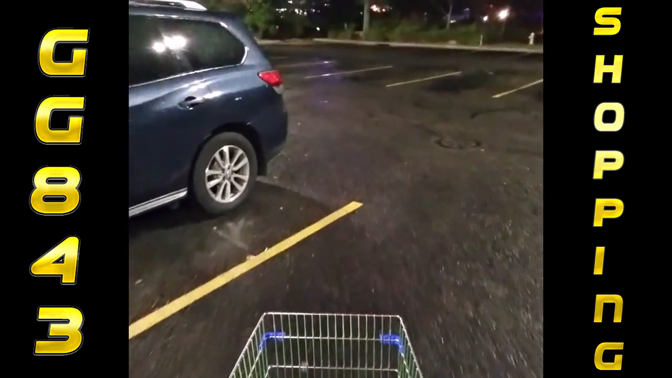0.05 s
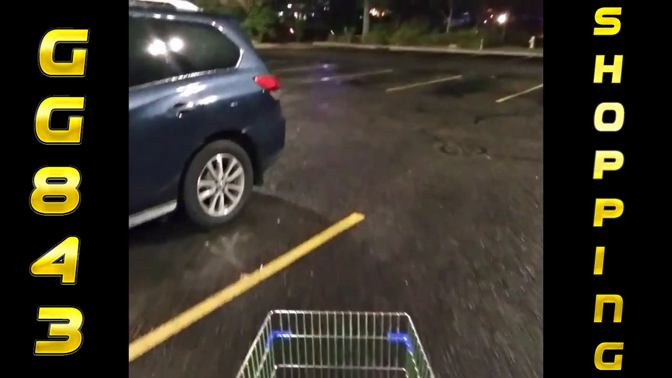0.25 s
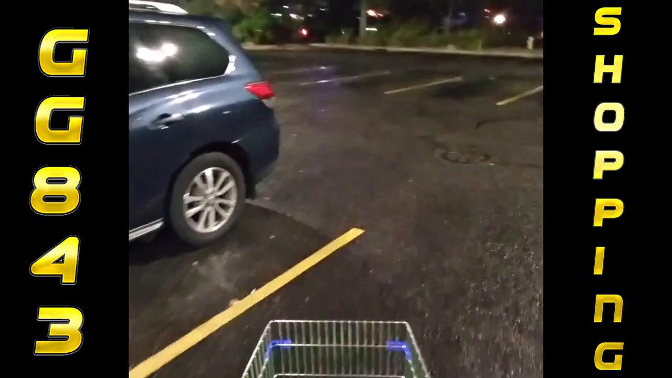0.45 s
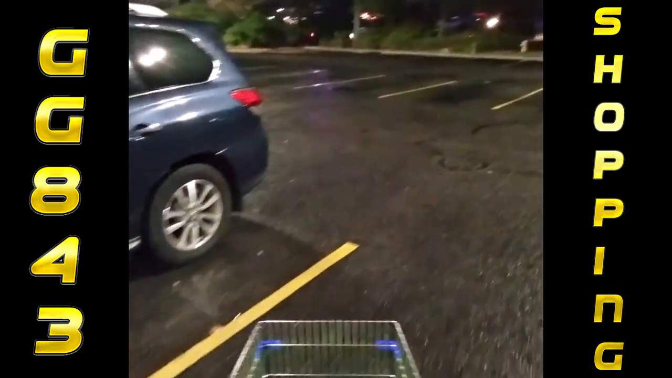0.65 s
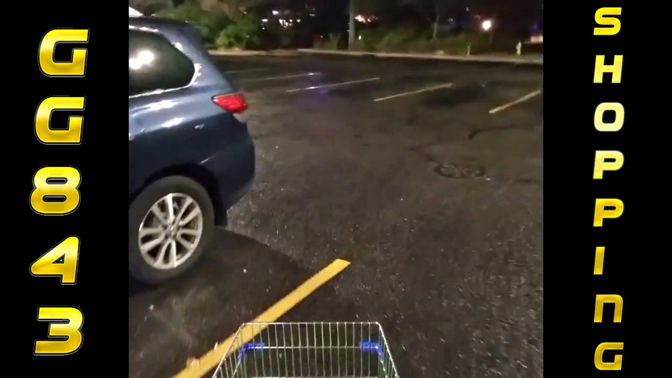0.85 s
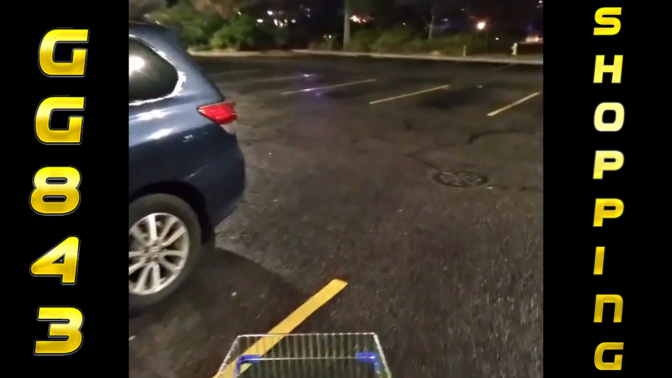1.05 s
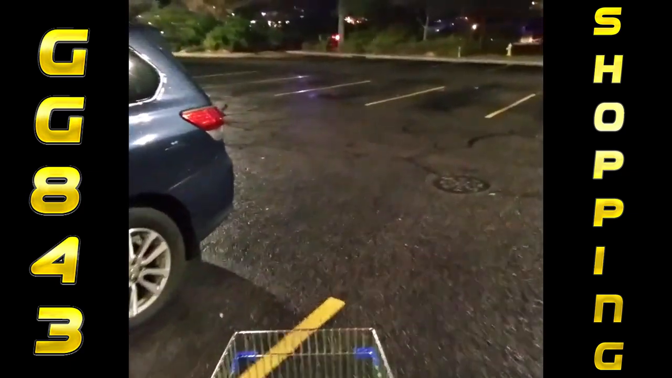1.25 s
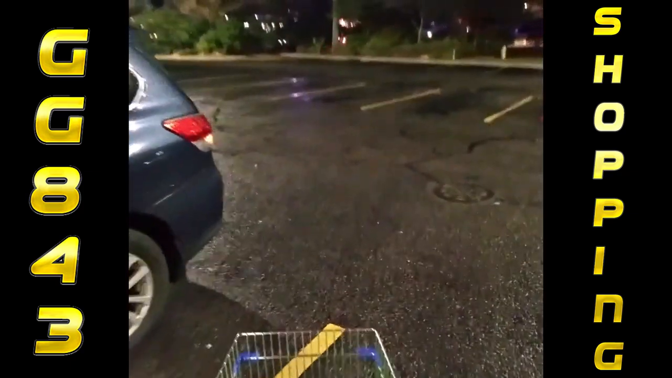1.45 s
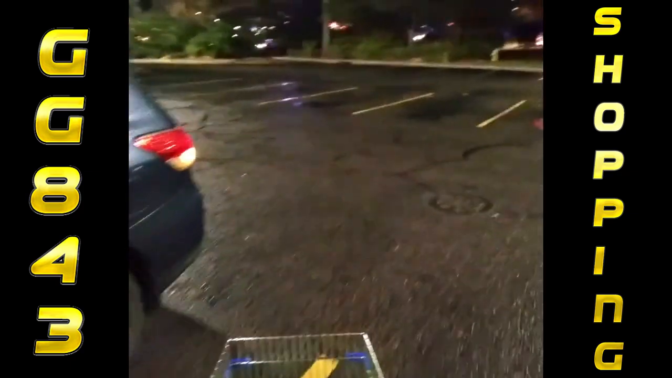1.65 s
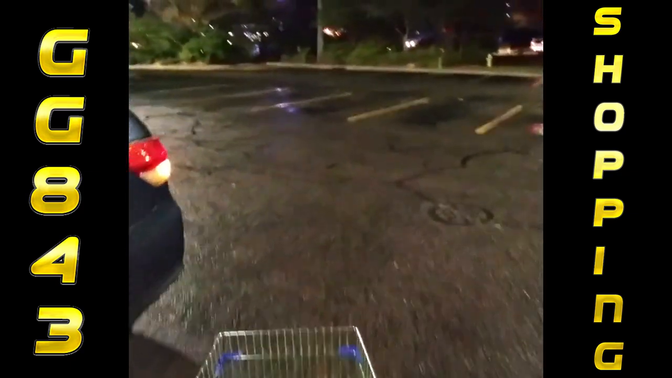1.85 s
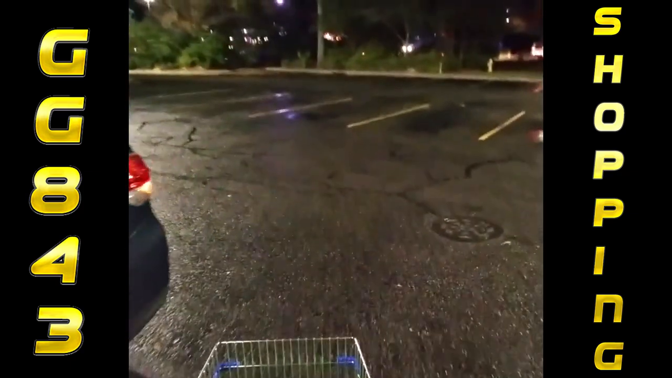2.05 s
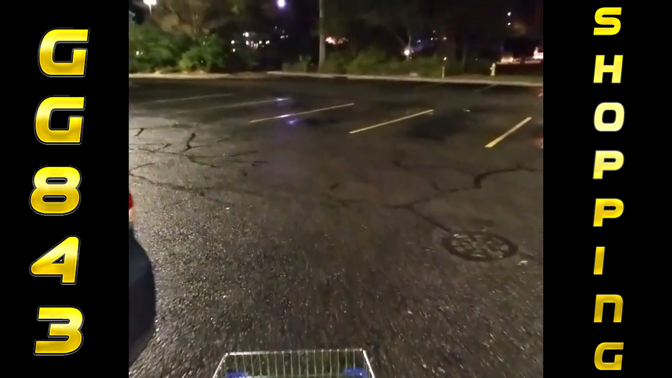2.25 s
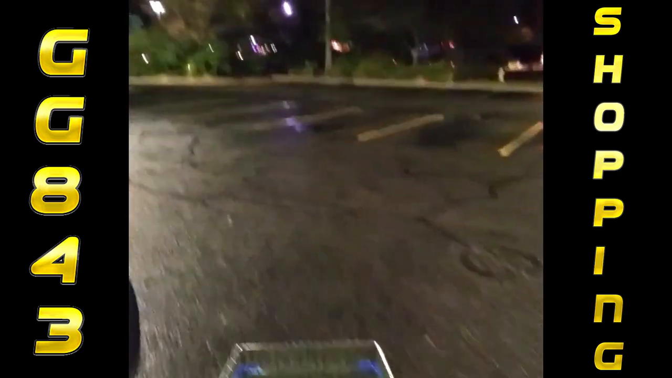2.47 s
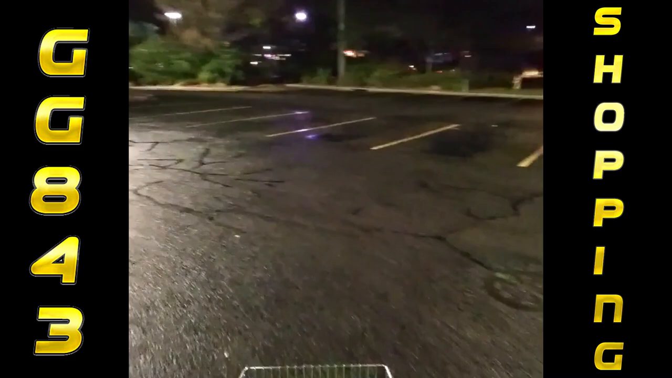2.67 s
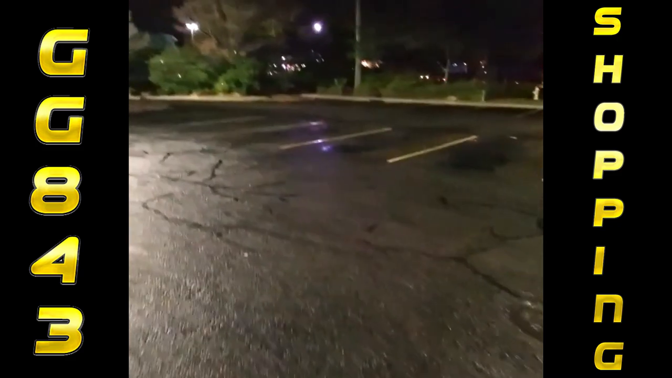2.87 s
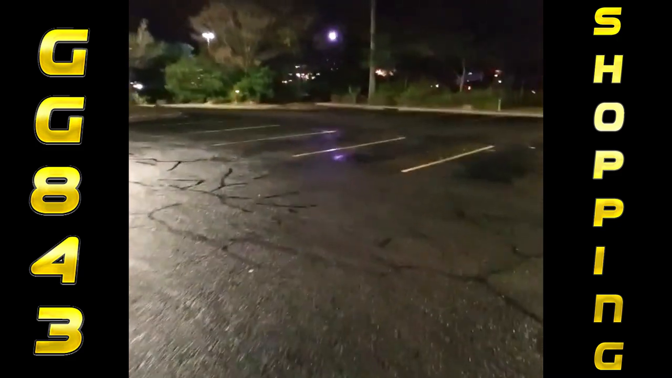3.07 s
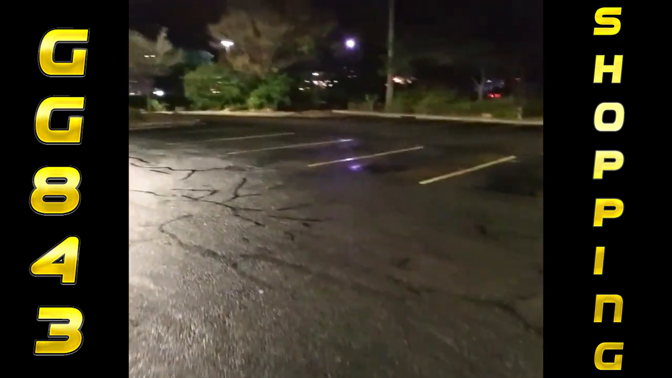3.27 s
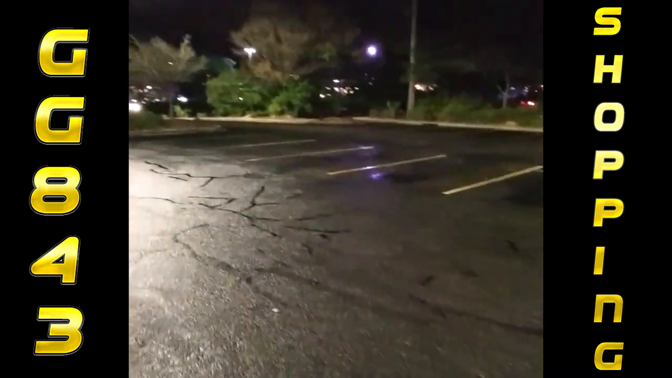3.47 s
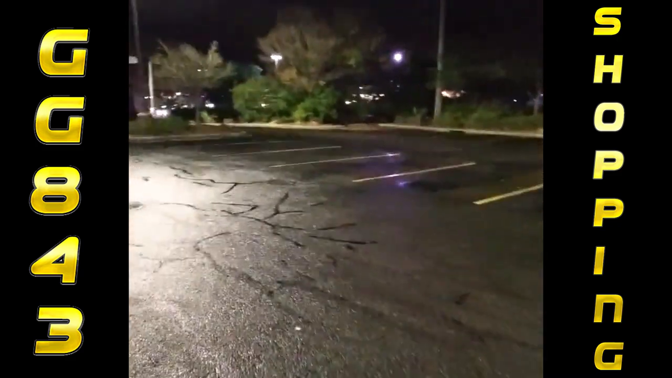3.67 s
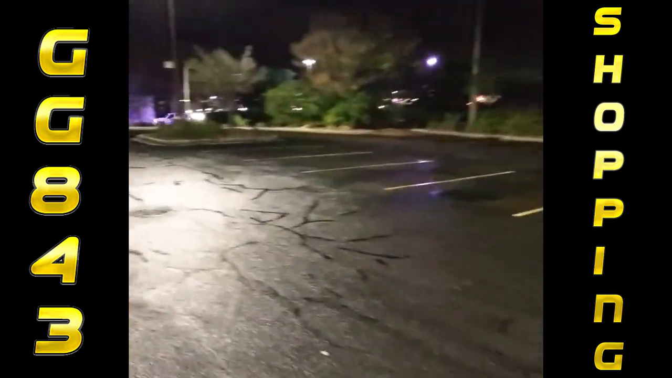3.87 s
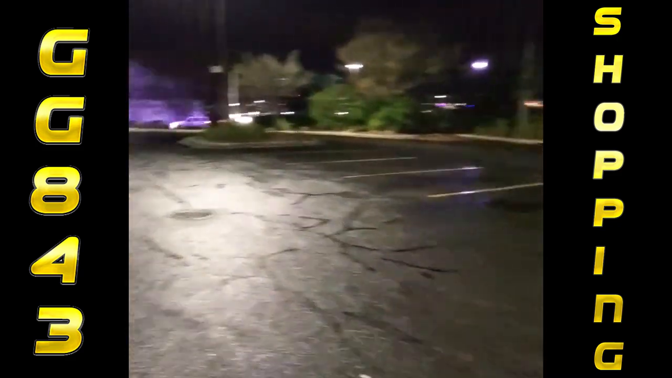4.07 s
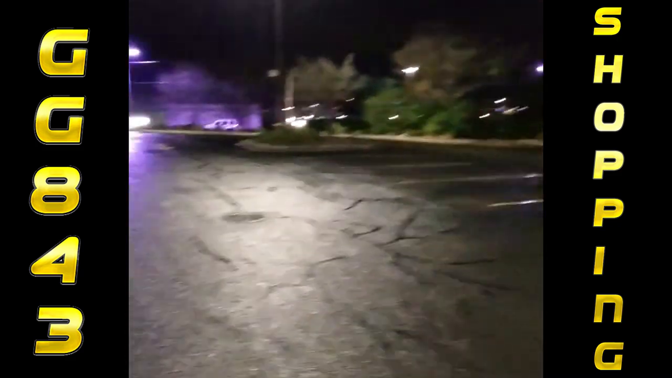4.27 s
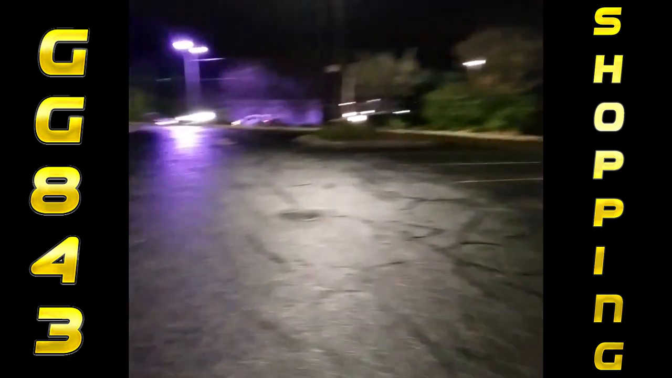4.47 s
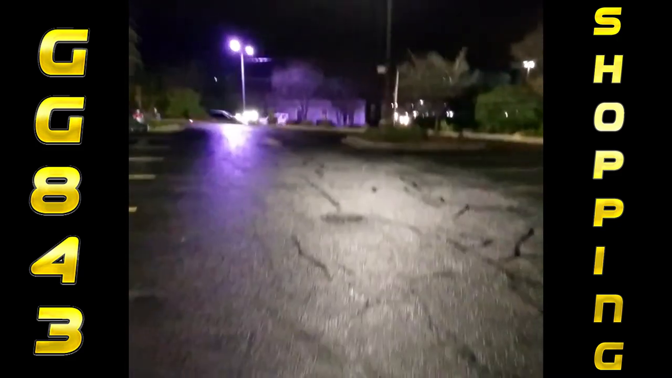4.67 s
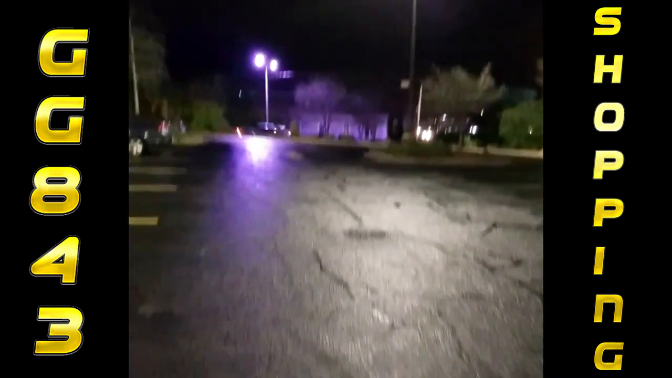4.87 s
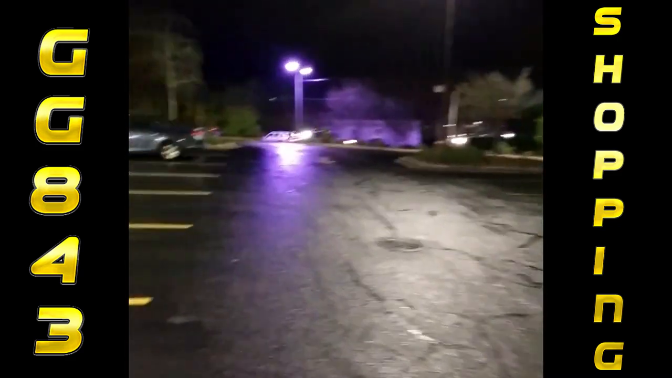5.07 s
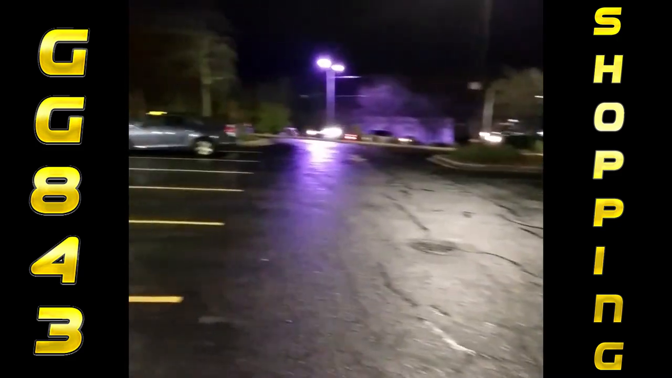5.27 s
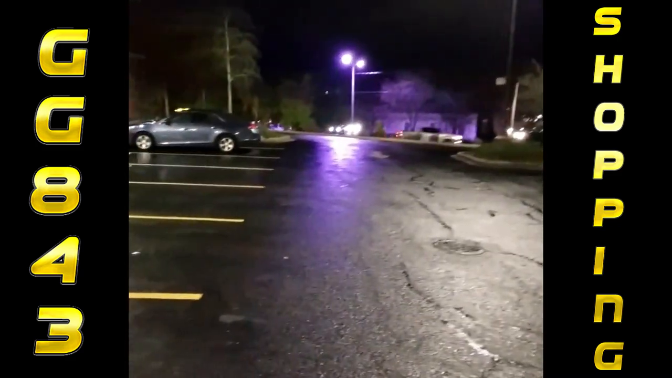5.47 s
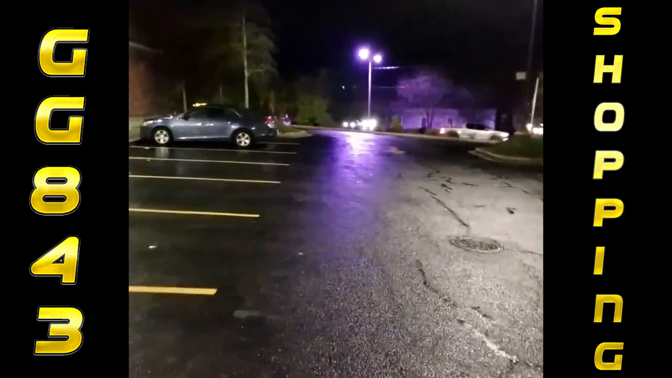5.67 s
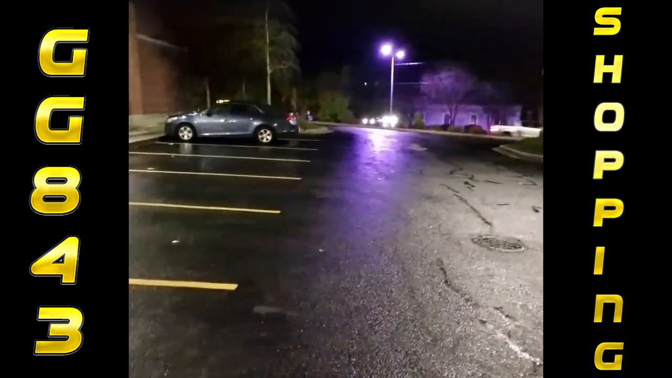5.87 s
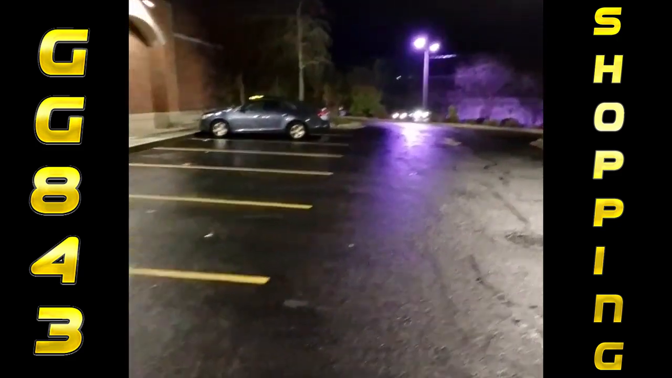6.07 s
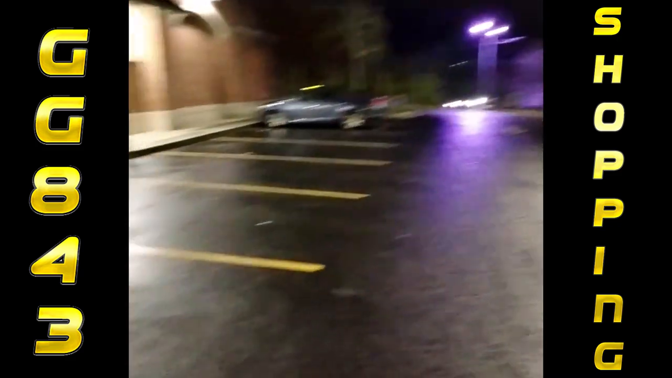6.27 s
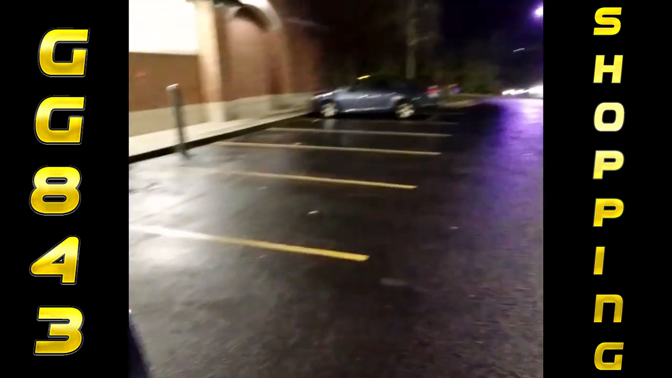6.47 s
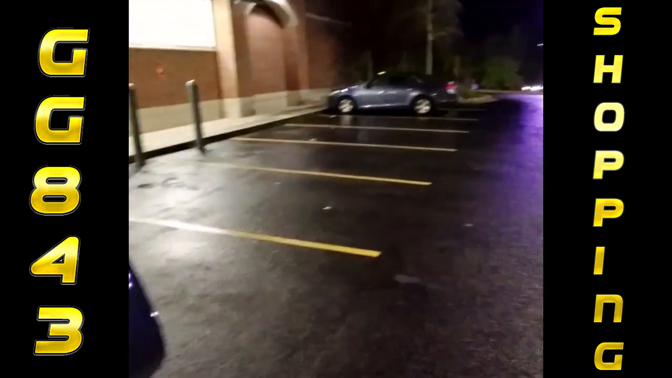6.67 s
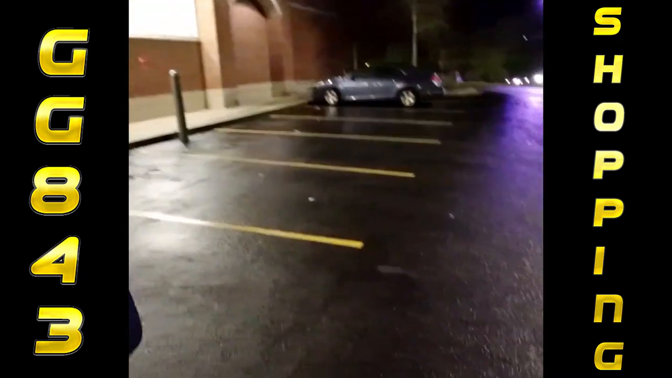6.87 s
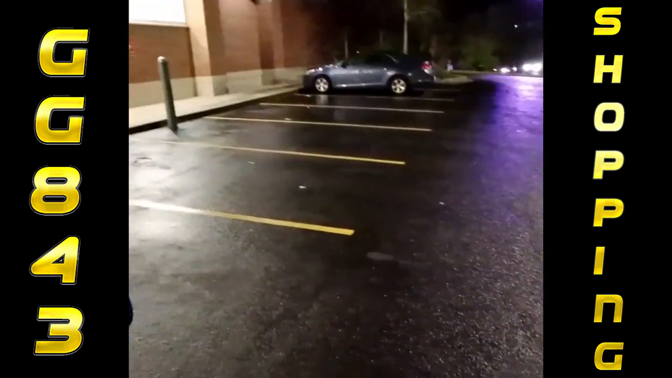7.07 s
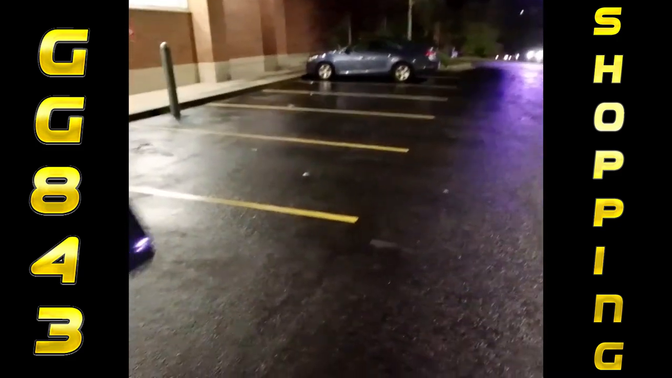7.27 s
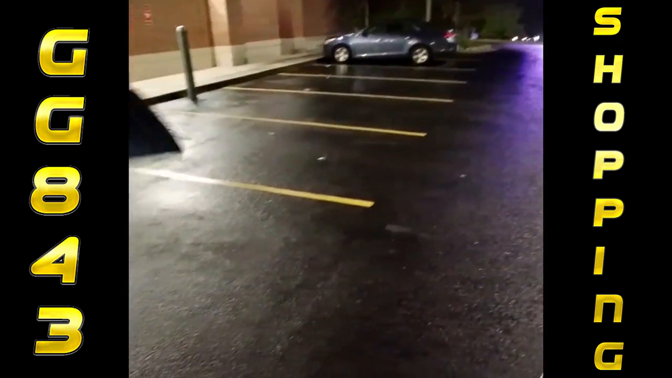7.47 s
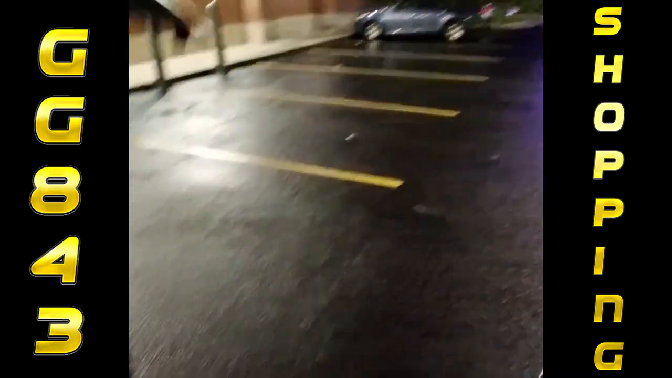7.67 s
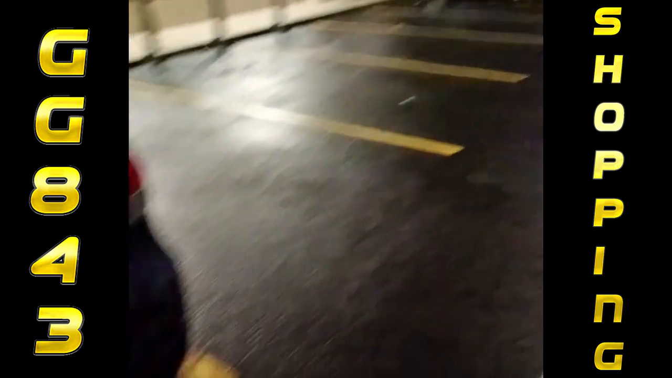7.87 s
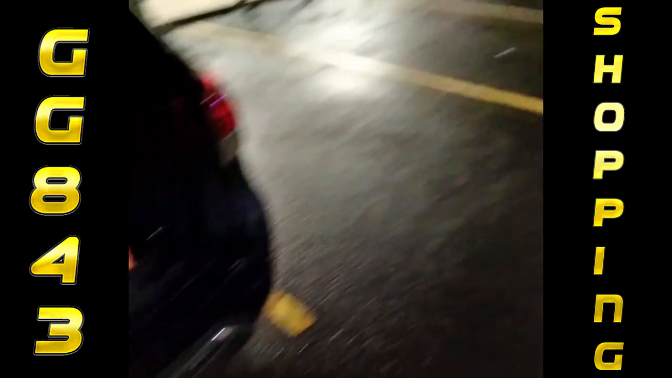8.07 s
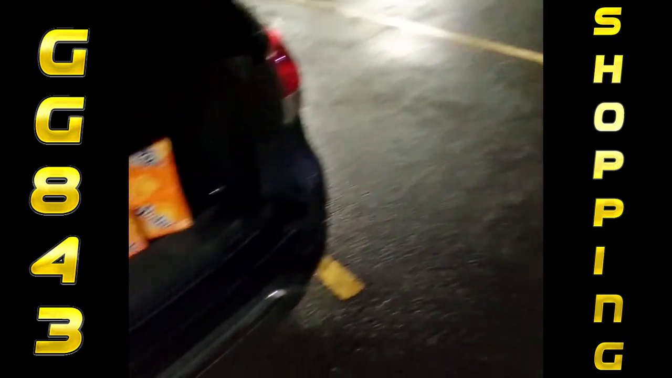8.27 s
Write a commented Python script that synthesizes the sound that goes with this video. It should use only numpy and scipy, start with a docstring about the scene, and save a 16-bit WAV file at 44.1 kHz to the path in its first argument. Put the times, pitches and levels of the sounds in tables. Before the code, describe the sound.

From the start, a metal shopping cart rolls over wet asphalt, heard from a hand-held phone just above it. Its wire basket gives a dense, bright rattle over the gritty roar and low rumble of hard wheels, with a faint ring from the frame. Frequent jolts make the wires tick and clash, and soft low thumps come in the first second and again just before 3 seconds. The cart slows at about 5 seconds and stops by 5.5 with a short cluster of knocks and a few last ticks. The parking lot is now much quieter, with a low rush of distant traffic. Two knocks sound close by at about 5.9 and 6.5 seconds. From 6 seconds a faint, far engine gathers speed. Light taps and soft swishes of cloth follow, growing into crisp crinkles around 8 seconds, just before the end.

```python
"""A wire basket rattles over roaring wheels: a metal shopping cart is pushed across wet asphalt at night.
Grit under the hard wheels rings the frame, jolts make the wires tick and clash, and soft thumps sound.
The cart stops after about 5.5 s, leaving distant traffic, two knocks, lighter taps and rustling cloth.
A hand-held phone just above the cart hears it all through two microphone openings, left and right,
which differ in the treble."""
import sys
import numpy as np
from scipy import signal
from scipy.fft import rfft, irfft, next_fast_len
from scipy.io import wavfile

SR = 44100
rng = np.random.default_rng(int(sys.argv[2]) if len(sys.argv) > 2 else 0)


def transcribe(u):
    """Save the signal u as a 16-bit wav file named by the first command-line argument.

    u: samples, shape (n,) or (channels, n), limited to [-1, 1]; the rate is SR.
    q: integer samples, one column per channel.
    """
    v = np.clip(np.atleast_2d(u).T, -1, 1)
    q = np.round(v * 32767).astype(np.int16)
    wavfile.write(sys.argv[1], SR, q)


N = 367353
TIME = np.arange(N) / SR
FFT_SIZE = next_fast_len(N + SR // 4)
HZ = np.maximum(np.arange(FFT_SIZE // 2 + 1) * SR / FFT_SIZE, 1)


def from_db(db):
    """Turn decibels into a factor to multiply by."""
    return 10 ** (np.asarray(db) / 20)


def rms_one(x):
    """Scale a signal so that its average strength (rms) is 1."""
    return x / np.sqrt(np.mean(x ** 2) + 1e-20)


def in_time(rows):
    """Join a table's points into curves over time."""
    times, *columns = np.transpose(rows)
    return [np.interp(TIME, times, column) for column in columns]


def in_hz(rows):
    """Join a table's points into curves over frequency."""
    hz, *columns = np.transpose(rows)
    return [np.interp(np.log(HZ), np.log(hz), column) for column in columns]


def tone_filter(db):
    """Turn a dB curve into a filter that never sounds ahead of its input (minimum phase)."""
    cepstrum = irfft(db * np.log(10) / 20, FFT_SIZE)
    cepstrum[1:FFT_SIZE // 2] *= 2
    cepstrum[FFT_SIZE // 2 + 1:] = 0
    return np.exp(rfft(cepstrum))


def drift(rate_hz):
    """A smooth random wobble, about 1 in size."""
    step = 40   # samples per random value
    r = np.exp(-2 * np.pi * rate_hz * step / SR)
    slow = signal.lfilter([1], [1, -2 * r, r * r], rng.standard_normal(N // step + 2002))[2000:]
    return np.interp(np.arange(N) / step, np.arange(len(slow)), rms_one(slow))


def ring(clicks, hz, t60):
    """Each click starts a tone. Its ring time, t60, is the seconds it takes to fade by 60 dB."""
    r, angle = from_db(-60 / (t60 * SR)), 2 * np.pi * hz / SR
    return signal.lfilter([0, np.sin(angle)], [1, -2 * r * np.cos(angle), r * r], clicks + 1e-18)


def bursts(times, dbs, t60, rise_s, holds=0):
    """Power over time of events that rise fast, hold and die away."""
    power = np.zeros(N + SR)
    for s, db, hold in np.broadcast(times, dbs, holds):
        t = np.arange(int((hold + t60) * SR)) / SR
        rise = 1 - np.exp(-t / rise_s)
        fall = from_db(db - 60 * np.maximum(t - hold, 0) / t60)
        start = round(s * SR)
        power[start:start + len(t)] += (rise * fall) ** 2
    return power[:N]


def grains(per_s, spread_db):
    """Two separate streams of tiny random clicks of uneven size."""
    sizes = from_db(spread_db * np.minimum(rng.exponential(1, (2, N)), 5))
    signs = rng.choice([-1, 1], (2, N))
    return rms_one(sizes * signs * (rng.random((2, N)) < per_s / SR))


def struck(ticks, tones, wobble_db, rate_hz, span_s):
    """Share ticks among eight groups of ringing tones; each tone swells and fades on its own."""
    group, rings = rng.integers(0, 8, N), np.zeros((2, N))
    part = slice(*[int(s * SR) for s in span_s])
    for k, (hz, db, t60) in enumerate(tones):
        gain = from_db(db + wobble_db * np.clip(drift(rate_hz), -3, 1.6)) / np.sqrt(t60)
        hits = gain * ticks * (group == k % 8)
        rings[:, part] += ring(hits[:, part], hz, t60)
    return rings * np.std(ticks) / np.std(rings)


# How the right microphone differs from the left, for sound from all around:
# (frequency [Hz], right minus left [dB], share from other paths [dB], phase shift [rad])
FROM_AROUND = [(60, 0, -35, 0), (350, 0, -33, 0), (900, 0, -18, 0), (2000, 0, -5, .3),
               (2750, -6, -.8, -1.2), (3600, -2, -.8, -1), (4800, 9, -.4, .5), (5600, 8, -.2, .5),
               (6500, -1, -1.5, 0), (9000, -7, -.4, 1), (12000, -17, -.2, 2.8), (14000, -11, -.8, 3)]
# The same for sound from the cart:
# (frequency [Hz], right minus left [dB], share from other paths [dB], phase shift [rad])
FROM_CART = [(60, 2.6, -6, 0), (400, 2.2, -12, 0), (750, .9, -18, 0), (1100, .2, -23, 0), (1800, 0, -25, 0),
             (2300, 0, -17, 0), (2580, -1, -5, -.2), (2750, -3, -1.2, -1.3), (2930, -2.7, -1.6, -2.7),
             (3100, -1.6, -4.5, -3.0), (3290, -.6, -12, -3.14), (3460, -2.5, -1.2, -3.8),
             (3620, -4.5, -.9, -5.3), (3960, -4.2, -1.6, -6), (4300, -1, -3, -6), (4800, 2, -3.5, -6.2),
             (5200, 2.2, -1.5, -6.4), (5500, 5.5, -.5, -9.4), (5800, 0, -.3, -9.3), (6350, -3, -.1, -7.9),
             (6650, -2.5, -1.2, -6.6), (7900, -3, -.1, -4.6), (9500, -8.5, -.6, -4.4),
             (10900, -8.5, -1, -4.9), (12000, -15, -.2, -3.7), (13400, -9, -1.2, -3.1)]

def microphones(pair, spectrum, direction, dips=()):
    """Shape a sound's tone. The right side mixes a shifted copy of the left with sound from other paths."""
    colour = tone_filter(in_hz(spectrum)[0])
    colour /= np.sqrt(np.mean(abs(colour) ** 2))
    right_db, other_db, phase = in_hz(direction)
    for hz, width, db in dips:
        right_db = right_db + db / (1 + (2 * (HZ - hz) / width) ** 2)
    share = from_db(np.minimum(other_db, 0))
    left, other = rfft(pair, FFT_SIZE) * colour
    shifted = np.sqrt(1 - share ** 2) * np.exp(1j * phase) * left
    right = from_db(right_db) * (shifted + share * other)
    return irfft([left, right], FFT_SIZE)[:, :N]


# The traffic as the phone turns it down, then lets it rise: (time [s], level [dB])
TRAFFIC_LEVEL = [(0, -69), (1.2, -86), (5.3, -39), (8.33, -41)]
# Its tone, from bass to treble: (frequency [Hz], relative level [dB])
TRAFFIC_SPECTRUM = [(25, -28), (45, -9.5), (90, 1), (170, -2), (340, -9), (860, -9), (1550, -14),
                    (2400, -25), (2800, -29), (4000, -35.5), (5200, -50), (6100, -39), (7600, -40),
                    (8600, -42), (14400, -42.5)]

def traffic():
    """A low rush of distant traffic; a set curve stands for the phone turning it down at first."""
    level = from_db(in_time(TRAFFIC_LEVEL)[0] + 0.33 * drift(5.4))
    return microphones(level * rng.standard_normal((2, N)), TRAFFIC_SPECTRUM, FROM_AROUND)


# A far engine gathers speed: (time [s], firing rate [Hz], level [dB])
ENGINE_RUN = [(6.0, 68, -70), (6.3, 69.1, -60), (6.8, 76.2, -52), (7.3, 88, -52), (7.6, 88.9, -45.5),
              (8.33, 89.1, -52)]

def engine():
    """The engine's firing makes a low, wavering tone and a second one an octave higher."""
    hz, db = in_time(ENGINE_RUN)
    phase = 2 * np.pi * np.cumsum(hz * (1 + .035 * drift(10))) / SR
    low = from_db(2.3 * drift(11)) * np.sin(phase)
    octave = from_db(-2 + 1.4 * drift(3.5)) * np.sin(2 * phase)
    return np.sqrt(2) * from_db(db) * (low + octave)


def hum(hz=121, start_s=6.2, stop_s=6.55, peak_db=-44):
    """A short, low hum swells and fades at one pitch."""
    progress = np.clip((TIME - start_s) / (stop_s - start_s), 0, 1)
    return from_db(peak_db) * np.sin(np.pi * progress) * np.sin(2 * np.pi * hz * TIME)


# Cloth moving near the phone: (start [s], length [s], level [dB])
SWISHES = [(6.244, 0.45, -53), (6.967, 0.19, -53.5), (7.223, 0.89, -50), (7.96, 0.19, -47.5),
           (8.154, 0.086, -38.5)]
# The tone of a swish: (frequency [Hz], relative level [dB])
SWISH_SPECTRUM = [(2500, -3.5), (4000, -13.5), (5300, -24), (7000, -11), (9000, -8.5), (10500, -4.5),
                  (12500, -1), (14200, -0.5)]

def cloth_swishes(rise_s=0.12, t60=0.39):
    """Rubbing fabric hisses, and its weave adds fleeting streaks of pitch."""
    stroke = np.zeros(N)
    for start, length, db in SWISHES:
        rise = np.clip((TIME - start) / rise_s, 0, 1) ** 2
        stroke += rise * from_db(db - 60 * np.maximum(TIME - start - length, 0) / t60)
    rubbing = stroke * from_db(0.83 * drift(15)) * grains(per_s=15000, spread_db=1)
    weave = [(hz, 0, .012) for hz in np.geomspace(9000, 14000, num=16)]
    streaks = from_db(-6) * struck(rubbing, weave, wobble_db=8, rate_hz=8, span_s=(5.5, 9))
    return microphones(rubbing + streaks, SWISH_SPECTRUM, FROM_AROUND)


# The cart's last ticks, a knock's crisp edge, then cloth crinkles: (time [s], rough peak level [dB])
CLICK_SPRAYS = [(5.5488, -36), (5.6384, -42), (5.682, -32), (5.8864, -23), (5.894, -20), (6.848, -42),
                (7.1816, -36), (7.9094, -36), (8.0447, -24), (8.079, -16.5), (8.1387, -27), (8.2139, -19),
                (8.2596, -18.5)]
# The tone of a spray: (frequency [Hz], relative level [dB])
SPRAY_SPECTRUM = [(2500, -3), (4000, -27), (5300, -26), (7000, -5), (9500, -2.5), (10500, -3), (11500, -3),
                  (13000, 7), (14200, 0.5)]

def click_sprays(peak_over_average_db=9.5):
    """Short, bright sprays of tiny clicks."""
    times, peak_db = np.transpose(CLICK_SPRAYS)
    power = bursts(times, peak_db - peak_over_average_db, t60=0.069, rise_s=.002)
    clicks = np.sqrt(power) * grains(per_s=10000, spread_db=2.5)
    return microphones(clicks, SPRAY_SPECTRUM, FROM_AROUND)


# Knocks and taps: (time [s], peak level [dB], middle of the pitch range [Hz])
KNOCKS = [(5.287, -26, 600), (5.295, -23, 955), (5.306, -27, 620), (5.317, -30, 950), (5.3296, -25, 1300),
          (5.347, -26.5, 900), (5.887, -17.5, 142), (5.889, -18.5, 830), (5.89, -32, 3200),
          (5.896, -20.5, 1090), (5.909, -24, 243), (5.924, -37, 210), (6.481, -20.5, 690),
          (6.4858, -30.5, 1300), (6.495, -23.5, 546), (6.518, -28, 800), (6.949, -39, 520),
          (7.181, -39, 1600), (7.299, -36, 91), (7.749, -39, 1500), (7.789, -31, 950), (7.905, -31, 1290),
          (8.026, -31.5, 720), (8.09, -30.5, 1090), (8.144, -31.5, 870), (8.2, -36, 1650),
          (8.237, -32, 1260)]
# Tones of the knocked object: (pitch [Hz], relative level [dB], ring time [s])
KNOCK_TONES = [(85, -0.5, 0.2), (132, -27, 0.037), (197, -2, 0.09), (254, 7.5, 0.051), (393, -5, 0.24),
               (458, 9, 0.026), (683, -4.5, 0.046), (946, -6, 0.1), (1750, -9.5, 0.088)]

def knocks(edge_ratio=1.59, tail_db=-6.5):
    """A hit rings a dull object and leaves a short, rough tail; its size sets which pitches sound."""
    out, click = np.zeros(N + SR), np.zeros(SR // 3)
    click[0] = 1
    t = np.arange(len(click)) / SR
    body = sum(from_db(db) * ring(click, hz, t60) for hz, db, t60 in KNOCK_TONES)
    for s, db, hz in KNOCKS:
        band = signal.butter(2, [hz / edge_ratio, hz * edge_ratio], "band", fs=SR, output="sos")
        muffle = signal.butter(2, 1.5 * edge_ratio * hz, fs=SR, output="sos")
        tail_t60 = 0.18 * (600 / hz) ** 0.57   # low tails last longer
        fade = from_db(-60 * t / tail_t60) * (1 - np.exp(-t / .0015))
        noise = fade * rng.standard_normal(len(t))
        tail, hit = signal.sosfilt(np.vstack([band, muffle]), [noise, body])
        knock = hit / np.max(abs(hit)) + from_db(tail_db) * tail / np.max(abs(tail))
        start = round(s * SR)
        out[start:start + len(t)] += from_db(db) * knock
    return out[:N]


# Low thumps:
# (time [s], peak level [dB], first pitch [Hz], last pitch [Hz], length [s], left minus right [dB])
THUMPS = [(0.313, -28, 85, 90, 0.043, -7), (0.334, -25, 330, 330, 0.013, -5),
          (0.345, -29, 170, 170, 0.013, -2), (.545, -33.5, 154, 152, 0.035, -11),
          (.566, -27, 125, 115, 0.031, -9), (0.633, -23, 190, 190, 0.0074, -2),
          (0.656, -30, 135, 135, 0.023, -2), (0.681, -29, 210, 210, 0.009, -2),
          (0.688, -22, 303, 305, 0.0078, -3), (.918, -32.5, 185, 170, 0.035, -2),
          (1.03, -27.5, 221, 222, .024, -2), (2.719, -27, 143, 138, 0.022, 0),
          (2.858, -25, 99.5, 135, 0.03, -1), (2.895, -27.5, 90, 90, 0.062, 0),
          (2.946, -27, 87, 247, 0.028, -5)]

def thumps():
    """Short, soft, low thumps near the phone, mostly to the right, some sliding in pitch."""
    out = np.zeros((2, N))
    for s, db, first_hz, last_hz, length, pan_db in THUMPS:
        progress = np.arange(int(length * SR)) / (length * SR)
        hz = first_hz + (last_hz - first_hz) * progress
        wave = np.sin(np.pi * progress) ** 2 * np.sin(2 * np.pi * np.cumsum(hz) / SR)
        start = round(s * SR)
        out[:, start:start + len(wave)] += from_db(db + pan_db * np.array([[.5], [-.5]])) * wave
    return out


# Jolts that shake the cart: (time [s], relative level [dB], length of the shaking [s])
JOLTS = [(0.004, -22.0, 0.094), (0.123, -21, 0.029), (0.242, -19.5, 0.014), (0.309, -22, 0.013),
         (0.385, -20.5, 0.039), (0.736, -27, 0.041), (0.778, -17.5, 0.036), (0.869, -32, 0.01),
         (0.891, -24, 0.01), (0.981, -31, 0.017), (1.002, -27, 0.017), (1.08, -21, 0.014),
         (1.119, -23.5, 0.01), (1.158, -24, 0.098), (1.332, -23.5, 0.046), (1.369, -20.5, 0.032),
         (1.418, -22.5, 0.011), (1.447, -19.5, 0.02), (1.528, -22, 0.056), (1.623, -24.5, 0.081),
         (1.675, -22, 0.021), (1.769, -23.5, 0.089), (1.867, -23, 0.023), (2.069, -26, 0.063),
         (2.246, -24.0, 0.026), (2.356, -22.5, 0.046), (2.384, -21, 0.027), (2.466, -27.0, 0.074),
         (2.529, -27.5, 0.073), (2.674, -41, 0.0092), (2.733, -28.5, 0.01), (2.753, -23, 0.047),
         (2.875, -30, 0.013), (2.912, -24, 0.078), (2.989, -20.5, 0.032), (3.084, -23, 0.01),
         (3.127, -23.5, 0.01), (3.158, -35, 0.014), (3.221, -24.5, 0.019), (3.332, -21, 0.054),
         (3.445, -25, 0.007), (3.543, -28.5, 0.064), (3.717, -27.5, 0.039), (3.766, -20.5, 0.012),
         (3.82, -25, 0.047), (3.903, -23.5, 0.042), (4.017, -25, 0.04), (4.036, -28, 0.064),
         (4.256, -27, 0.01), (4.299, -23, 0.025), (4.36, -22.5, 0.028), (4.44, -27, 0.017),
         (4.489, -23, 0.017), (4.611, -31.5, 0.036), (4.73, -24, 0.037), (4.802, -27, 0.046),
         (4.852, -25, 0.036), (4.943, -32, 0.013), (4.965, -25.5, 0.007), (4.996, -27, 0.007),
         (5.057, -34, 0.077), (5.19, -33.5, 0.035), (5.269, -30, 0.0092), (5.382, -33, 0.002),
         (5.434, -37, 0.0053)]

def jolt_power(gain_db, rise_s):
    """How hard the jolts shake the cart over time; each holds a while, then dies away."""
    times, db, holds = np.transpose(JOLTS)
    return bursts(times, db + gain_db, t60=0.24, rise_s=rise_s, holds=holds)


# Wire hitting wire: (time [s], level [dB])
CLASHES = [(0.2438, -15), (0.392, -14), (0.400, -12), (0.799, -12), (1.5349, -15), (1.7878, -12),
           (2.686, -13), (2.9262, -7), (3.0145, -11), (3.0288, -9), (3.0944, -11), (3.3393, -16),
           (3.352, -14), (3.7713, -12), (4.7371, -15), (5.0644, -22)]

def clash_power():
    """Short, sharp spikes of power where the wires clash."""
    times, db = np.transpose(CLASHES)
    return bursts(times, db, t60=.03, rise_s=.0012)


# The frame's main ringing tone: (time [s], relative level [dB], pitch [Hz])
FRAME_RING = [(0.0, -52, 730), (0.03, -39, 703), (0.29, -34.5, 699), (0.39, -26, 726), (0.48, -39, 707),
              (1.23, -34.5, 694), (1.27, -41, 713), (1.51, -31, 690), (2.24, -38.5, 723),
              (2.49, -30.5, 697), (2.65, -36.5, 723), (2.71, -38.5, 661), (3.01, -32, 710),
              (3.21, -39.5, 732), (3.48, -37.5, 661), (3.5, -52, 721), (3.65, -31.5, 672), (4.14, -39, 709),
              (4.21, -27, 714), (4.26, -39.5, 722), (4.46, -26.5, 694), (4.71, -38.5, 708),
              (4.75, -31.5, 696), (5.2, -49, 683)]

def frame_ring(width_hz=55, gain_db=-2, flutter_db=2):
    """Grit keeps the frame ringing: a narrow band of noise around a wandering pitch."""
    db, hz = in_time(FRAME_RING)
    phase = 2 * np.pi * np.cumsum(hz) / SR
    smoothing = signal.butter(1, width_hz / 2, fs=SR, output="sos")
    slow = signal.sosfilt(smoothing, rng.standard_normal((2, N)))
    tone = rms_one(slow[0] * np.cos(phase) + slow[1] * np.sin(phase))
    pan_db = np.array([[-.5], [.5]])
    return from_db(db + gain_db + flutter_db * drift(17) + pan_db) * tone


# How loud the wheels roar between jolts: (time [s], level [dB])
ROAR_LEVEL = [(0, -38), (.3, -36), (.55, -34.5), (.75, -32.5), (1.0, -36.5), (1.25, -36), (1.32, -40),
              (1.4, -38), (1.7, -35), (2.1, -33), (2.25, -35.5), (2.5, -32.5), (2.7, -37), (3.08, -35),
              (3.35, -37.5), (3.7, -36.5), (4.1, -37), (4.35, -34), (4.55, -37.5), (4.8, -34.5),
              (4.95, -37.5), (5.15, -40), (5.45, -49)]
# The tone of the roar: (frequency [Hz], relative level [dB])
ROAR_SPECTRUM = [(150, -30), (250, -12.5), (289, -14.5), (383, -9.5), (462, -12.5), (700, -2.5), (917, -7),
                 (1130, -4), (2020, -8.5), (2340, -13), (3000, -12), (3900, -79), (6600, -120)]
# The frame's other tones: (pitch [Hz], relative level [dB], ring time [s])
FRAME_TONES = [(591, 0.5, 0.092), (781, -1.5, 0.083), (872, -2, 0.12), (1010, 1, 0.013), (1157, -6, 0.14),
               (1420, -3, 0.06), (1683, -4, 0.05), (1840, -4, 0.05), (2286, -3, 0.05)]

def wheel_roar(share_db=-13):
    """Hard wheels crunch over grit and ring the frame; a share of each jolt and clash reaches them."""
    power = from_db(in_time(ROAR_LEVEL)[0]) ** 2 + jolt_power(share_db, rise_s=0.0053)
    power += from_db(share_db) ** 2 * clash_power()
    grit = np.sqrt(power) * from_db(1.2 * drift(25)) * grains(per_s=6000, spread_db=2)
    frame = from_db(-14) * struck(grit, FRAME_TONES, wobble_db=4.5, rate_hz=12, span_s=(0, 6))
    return microphones(grit + frame, ROAR_SPECTRUM, FROM_CART)


# The tone of the rumble: (frequency [Hz], relative level [dB])
RUMBLE_SPECTRUM = [(15, -14), (25, -28), (48, -8.5), (92, 4), (236, 1), (288, -3.5), (500, -3),
                   (650, -28.5), (1100, -120)]

def ground_rumble(level_db):
    """Rolling over the ground makes a deep, lumpy noise."""
    rumble = from_db(level_db + 2 * drift(16)) * rng.standard_normal((2, N))
    return microphones(rumble, RUMBLE_SPECTRUM, FROM_CART)


# The tone of the rattle at the left microphone: (frequency [Hz], relative level [dB])
BASKET_SPECTRUM = [(1500, -32.5), (2400, -3), (2900, -26), (3400, -12.5), (3800, -6.5), (4300, -7.5),
                   (4800, -12), (5550, -20), (6100, -6), (8000, -3.5), (9500, 2), (11000, 1.5), (12200, 7),
                   (13100, 10.5), (13700, 12.5), (14300, 0.5)]
# Wires that stand out: (pitch [Hz], relative level [dB], ring time [s])
WIRE_TONES = [(4283, -7, .03), (6670, -12, 0.08), (6480, -9, .08), (9560, -1.5, .03), (10100, 0, .04),
              (13890, -2, 0.04)]
# Gaps in the treble at the right microphone: (frequency [Hz], width [Hz], level change [dB])
RIGHT_DIPS = [(7030, 500, -8), (8400, 500, -5), (10130, 330, -14), (11420, 330, -11), (12560, 350, -11)]
# The phone turns a little, so the right side loses some rattle: (time [s], level change [dB])
PHONE_TURN = [(0, 1), (2.4, -0.5), (5.5, -1.5)]

def basket_rattle(between_jolts_db, ring_cycles=150):
    """Shaken wires tick against each other in dense clumps, ring briefly and sometimes clash."""
    shake = np.sqrt(from_db(between_jolts_db) ** 2 + jolt_power(gain_db=0.5, rise_s=0.0049))
    clumps = from_db(0.14 * drift(14) + 0.67 * drift(150))
    ticks = shake * clumps * grains(per_s=12000, spread_db=0.5)
    wires = WIRE_TONES + [(hz, -3, ring_cycles / hz) for hz in np.geomspace(2500, 14200, num=30)]
    rings = from_db(-8) * struck(ticks, wires, wobble_db=6.5, rate_hz=14, span_s=(0, 6))
    clashes = np.sqrt(clash_power()) * rng.standard_normal((2, N))
    heard = microphones(ticks + rings + clashes, BASKET_SPECTRUM, FROM_CART, RIGHT_DIPS)
    heard[1] *= from_db(in_time(PHONE_TURN)[0])
    return heard


# How loud the rolling cart is: (time [s], rattle between jolts [dB], rumble [dB])
ROLL_LEVELS = [(0.0, -28.5, -48), (0.35, -25, -38), (0.7, -22, -45.5), (0.9, -28.5, -44.5),
               (1.1, -24.5, -48), (1.26, -29, -58), (1.32, -27, -40.5), (1.4, -33, -39.5),
               (1.6, -26.5, -43), (2.0, -26, -40.5), (2.3, -26.5, -39.5), (2.55, -25, -42),
               (2.72, -29, -41.5), (2.9, -25, -39), (3.3, -27, -44), (3.7, -29.5, -38.5),
               (4.15, -27.5, -39), (4.45, -24, -42), (4.62, -29, -44), (4.95, -28, -48), (5.1, -36.5, -57),
               (5.33, -40, -52), (5.47, -72, -57)]

def cart(stop_s=5.76, fade_s=0.41):
    """Basket, wheels and frame sound together, then fall silent as the cart stops."""
    rattle_db, rumble_db = in_time(ROLL_LEVELS)
    rolling = np.clip((stop_s - TIME) / fade_s, 0, 1)
    basket = basket_rattle(rattle_db + 20 * np.log10(rolling + 1e-3))
    wheels = wheel_roar() + frame_ring() + ground_rumble(rumble_db)
    return basket + rolling * wheels


def scene():
    """Add up the cart, the distant street and the small sounds near the phone."""
    return cart() + traffic() + engine() + hum() + thumps() + cloth_swishes() + click_sprays() + knocks()


def record(dry):
    """The microphones lose the deepest bass, and the highest treble is cut off steeply."""
    bass_cut = signal.butter(2, 40, "high", fs=SR, output="sos")
    treble_cut = signal.ellip(12, .5, 62, 14290, fs=SR, output="sos")
    return signal.sosfilt(treble_cut, signal.sosfilt(bass_cut, dry))


dry = scene()
out = record(dry)
transcribe(out)
```